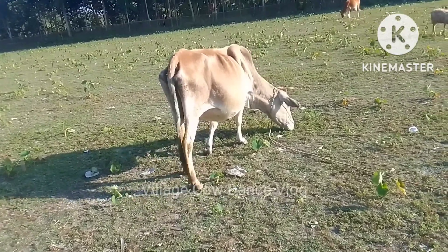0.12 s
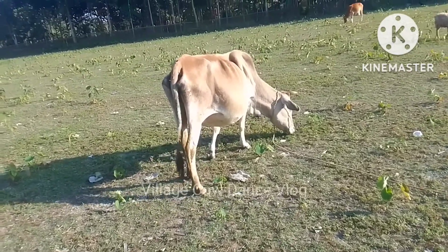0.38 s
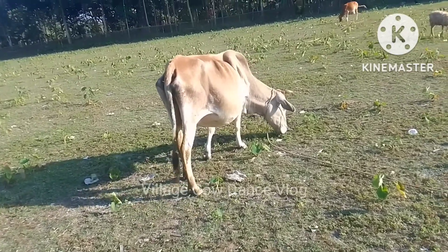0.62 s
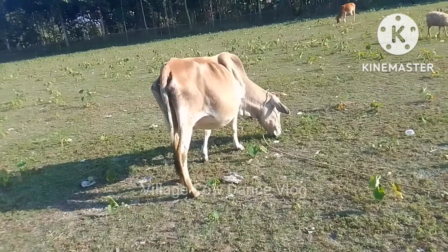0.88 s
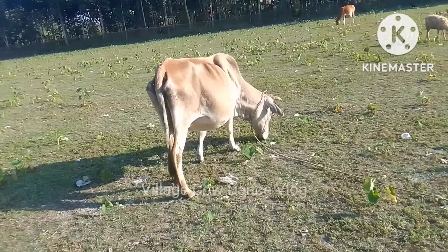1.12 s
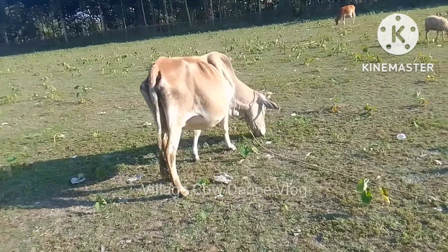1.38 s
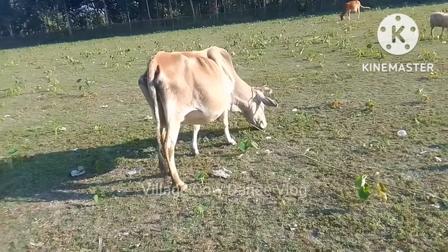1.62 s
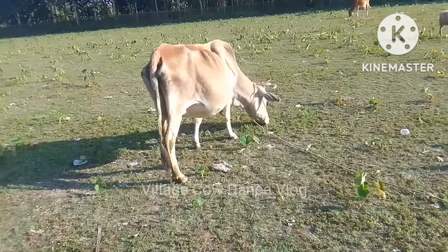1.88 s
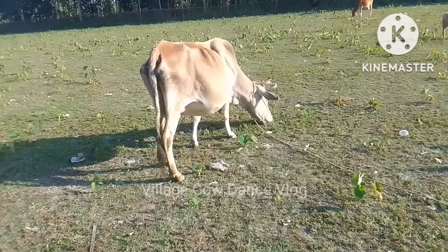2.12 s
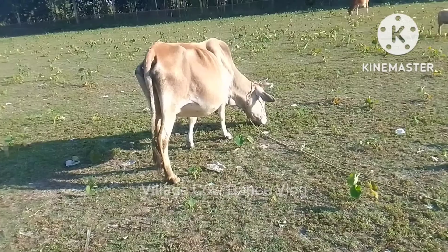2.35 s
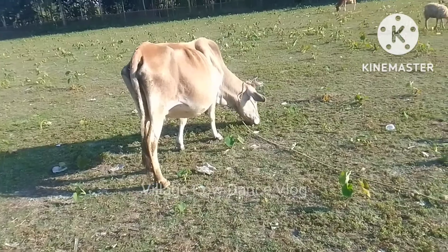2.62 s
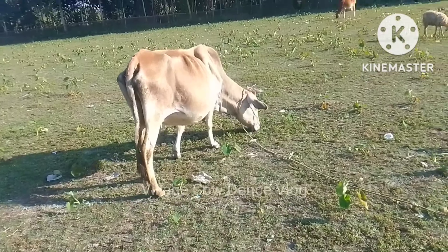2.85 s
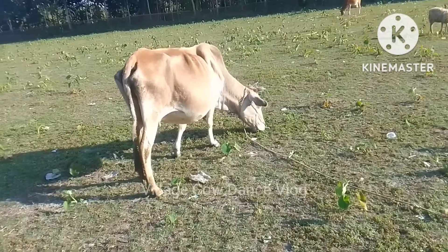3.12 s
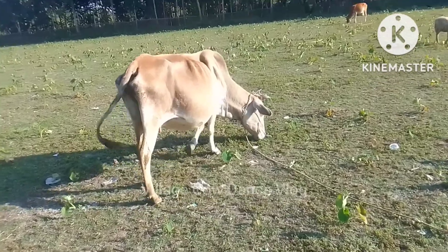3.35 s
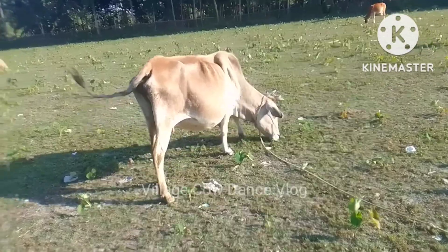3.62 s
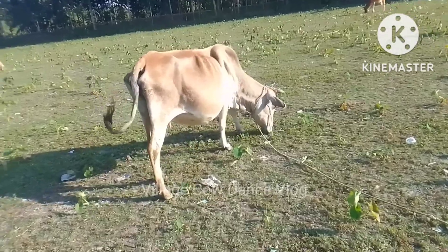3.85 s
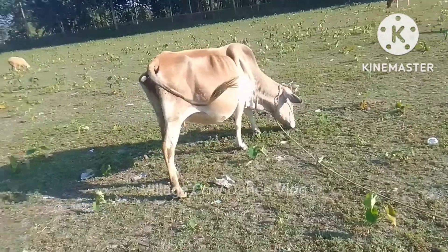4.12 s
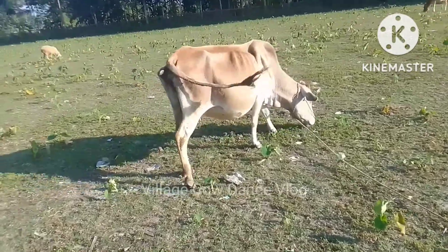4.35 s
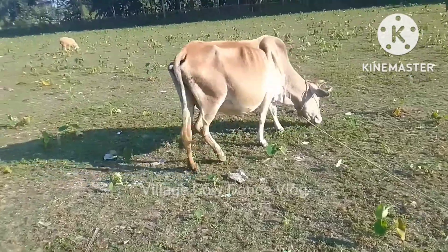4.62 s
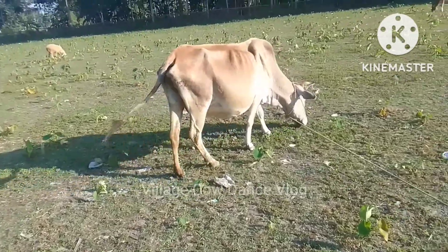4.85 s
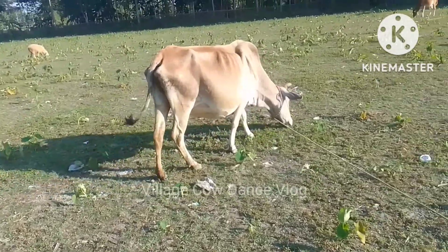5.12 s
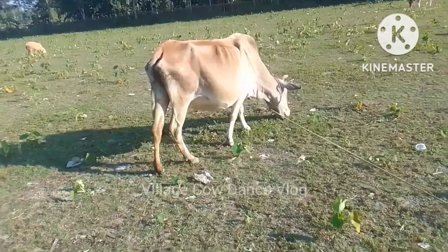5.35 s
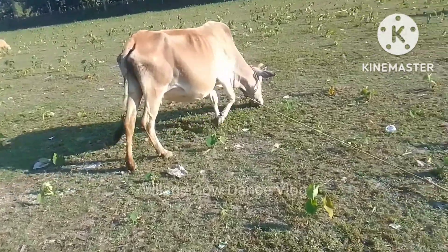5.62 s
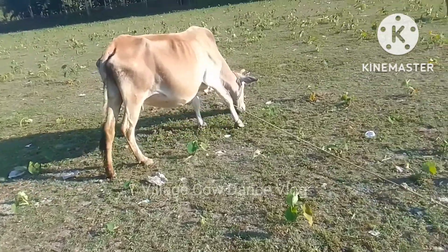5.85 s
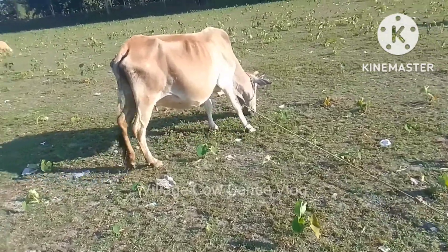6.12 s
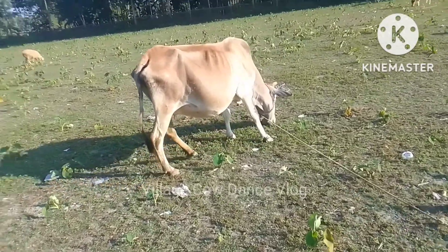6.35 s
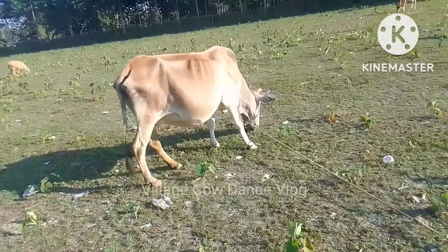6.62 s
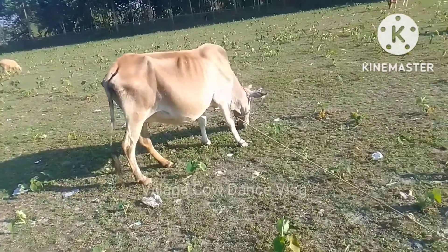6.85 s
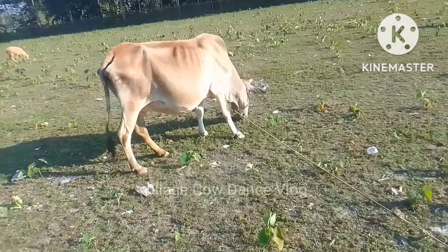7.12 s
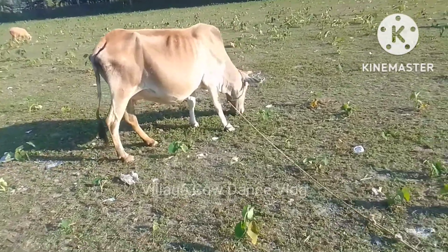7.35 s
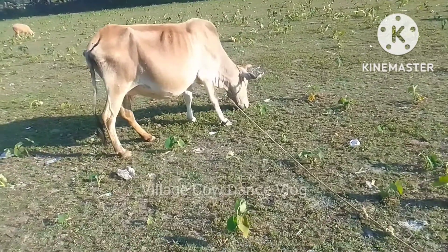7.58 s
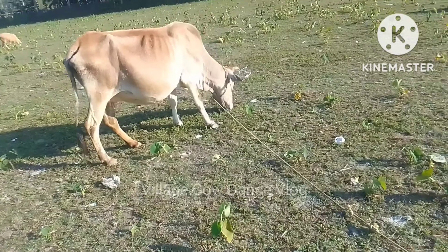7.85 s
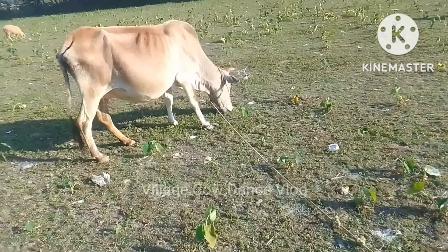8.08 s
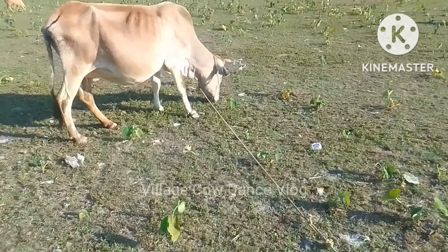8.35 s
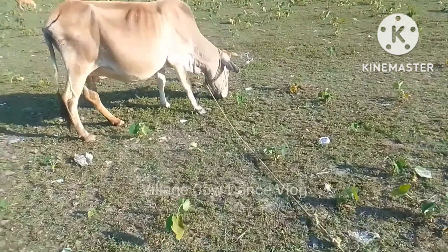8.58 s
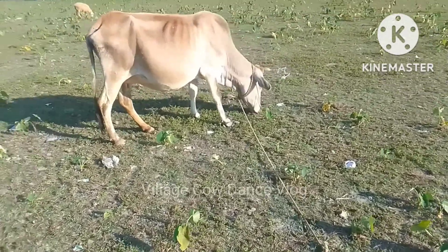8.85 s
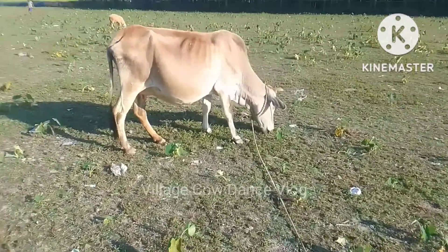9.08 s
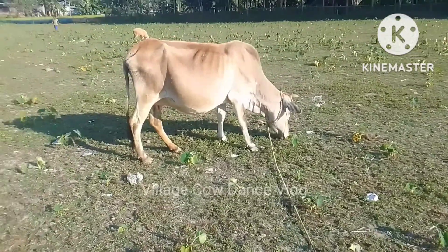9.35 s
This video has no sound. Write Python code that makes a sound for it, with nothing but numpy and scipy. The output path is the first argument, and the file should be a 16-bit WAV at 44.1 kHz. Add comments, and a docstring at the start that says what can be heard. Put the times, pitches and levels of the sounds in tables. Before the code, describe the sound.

Open field, nearly dry sound, with faint wind mutter and thin steady air throughout. After a short quiet opening, a cow hums from 0.4 s with mouth shut, opens at 0.7 into a low, buzzy moo near 87 Hz, and closes, sinking away by 2.0. In the gap, quick faint bird chirps, a small wind thump, a dry stalk snap at 2.1, grass rustle and a weak far moo. At 2.5 a creaky hum rises, cracks upward at 2.9 and holds a harsh, rough high bellow around 500 Hz until 4.7, then tumbles to a growl by 5.2. Brief rustle at 5.6 as the third call climbs; from 6.0 to 7.0 it is the loudest, a rounded hoot near 260 Hz, then drops low by 7.7. A faint far moo overlaps the fourth call's creaky start at 7.8; it rises to about 150 Hz at 8.5 and sinks until 9.5, with soft grass rustling.

```python
"""Cows moo in an open field: four calls start low and open out; the second and third break into a high register.
Each voice is a source and filter: pulses of air and turbulence excite the moving resonances of a throat.
Far cattle and small birds are gliding sines; breath hisses with the effort of the calls.
Filtered grains make the grass rustle and snap; shaped noise makes wind and a thin steady air."""
import sys
import numpy as np
from scipy import signal
from scipy.fft import rfft, irfft
from scipy.io import wavfile
from scipy.ndimage import uniform_filter1d

SR = 44100
rng = np.random.default_rng(int(sys.argv[2]) if len(sys.argv) > 2 else 0)


def store_wav(level_fs):
    """Save 16-bit WAV to argv[1]."""
    pcm = np.round(np.clip(np.atleast_2d(level_fs), -1, 1) * 32767)
    wavfile.write(sys.argv[1], SR, pcm.T.astype(np.int16))


def convert_level_to_amplitude(level_db):
    """Map a level in decibels to its linear amplitude factor."""
    exponent = np.asarray(level_db, float) / 20
    return 10 ** exponent


N = 417612
TIME = np.arange(N) / SR

CREAK = 3.0   # how sharply slow folds chop the turbulence into one burst a cycle
# Throat resonances of the shut mouth in the second and third calls: freq_hz, level_db
SHUT_MOUTH = [(95, -4), (240, -2), (580, -10), (850, -10.5), (1650, -8.5), (2700, -20)]


def cows():
    """Linear superposition: four calls add, and most phrases also excite a chest resonance."""
    plain, through_chest = np.zeros(N), np.zeros(N)
    first_call(plain)
    second_call(through_chest)
    third_call(plain, through_chest)
    fourth_call(through_chest)
    return plain + through_chest + chest(through_chest)


def first_call(out):
    """Source and filter: one low note passes through a shut, an open and a closing mouth."""
    # Pitch glides: start_s, end_s, from_hz, to_hz, bend (1 straight, higher = flatter top)
    low = [(.36, 1.1, 59.5, 87.36, 6.0), (1.2, 1.7, 87.26, 64.22, 3.9)]
    # Throat resonances: freq_hz, level_db
    shut = [(85, 1.5), (250, 11.5), (580, 8), (850, -3), (2000, -4), (2900, -13.5)]
    open_mouth = [(90, -16), (310, 3.5), (620, -10), (790, 4.5), (1130, -0.5), (1580, -5), (2100, -1.5),
                  (2600, -7.5), (3300, -18.5), (4300, -27.5)]
    closing = [(300, 8), (760, -8.5), (1950, -16), (2750, -9)]
    add(out, *phrase(low, (.36, .725), shut, (-10, -20), slide=(1.05, .88), creak=CREAK))
    add(out, *phrase(low, (.715, 1.665), open_mouth, (-21, -14), reopen=0.98),
        fade_s=0.0053, fade_out_s=0.066)
    add(out, *phrase(low, (1.62, 1.97), closing, (-8, 10), slide=(1.06, .9), creak=0.33), fade_s=0.085)


def second_call(out):
    """Register break: the pitch leaps, a second vibration joins the folds, then the note falls."""
    # Pitch glides: start_s, end_s, from_hz, to_hz, bend (1 straight, above 1 = flatter top, below 1 = steeper)
    low = [(2.53, 2.93, 81.54, 161.1, .6)]
    break_note = [(2.9, 3.0, 323.6, 337, 1.35)]
    high = [(3.09, 3.87, 438.4, 518.4, 1.02), (3.87, 4.7, 521.8, 487.2, 4.5)]
    fall = [(4.66, 4.97, 301, 162.4, 3.4), (4.97, 5.16, 159.8, 71.1, .55)]
    # Second vibration of the folds: time_s, pitch_hz, level_db (against the first)
    second = [(3.36, 308, -4), (4.7, 310, -1)]
    # Every few cycles one stands out: cycles, then rows of time_s, level_db
    fifths = 5, [(3.37, -14), (3.6, -7)]
    # Throat resonances, and the low hump that the closing mouth adds: freq_hz, level_db
    open_mouth = [(268, 11), (490, 3.5), (625, 10), (920, 6), (1130, 15), (1620, 5.5), (2100, 6),
                  (2700, -11.5), (3500, -24.5)]
    nasal = [(225, 18.5)]
    add(out, *phrase(low, (2.53, 2.85), SHUT_MOUTH, (-12, -16), slide=(1.06, .88), creak=CREAK))
    add(out, *phrase(low, (2.84, 2.912), open_mouth, (-12, -6)))
    add(out, *phrase(break_note, (2.9, 3.102), open_mouth, (-2, -2), jitter=0.0055))
    add(out, *phrase(high, (3.09, 3.38), open_mouth, (-10, -7), ringing=(2, 4.)))
    add(out, *phrase(high, (3.367, 4.71), open_mouth, (-5, -3), jitter=0.00507, second=second,
                     uneven=fifths, slide=(.96, 1.02)), fade_out_s=.05)
    add(out, *phrase(fall, (4.66, 5.16), open_mouth + nasal, (-1, -9), jitter=.004), fade_s=0.02)
    add(out, *phrase(fall, (5.12, 5.36), open_mouth, (15, 15)), fade_s=0.059)


def third_call(plain, through_chest):
    """Locking to a resonance: the fundamental of the high note stands far out; low notes flank it."""
    # Pitch glides: start_s, end_s, from_hz, to_hz, bend (1 straight, higher = flatter top)
    low = [(5.57, 5.98, 84.16, 162.9, 1)]
    high = [(5.96, 6.6, 243.3, 268.4, 4.0), (6.6, 7.05, 269.8, 247, 3.3)]
    fall = [(7.03, 7.72, 157.2, 70.53, 1.1)]
    # Every few cycles one stands out: cycles, then rows of time_s, level_db
    thirds = 3, [(6.55, -39), (6.75, -8), (7.05, 0)]
    # Throat resonances: freq_hz, level_db
    open_mouth = [(130, -16), (275, 4.5), (760, -3.5), (1130, -3), (1350, -5), (1700, -9), (2250, -16.5),
                  (2800, -25.5)]
    add(through_chest, *phrase(low, (5.57, 5.73), SHUT_MOUTH, (-6, -10), creak=CREAK))
    add(through_chest, *phrase(low, (5.72, 5.98), open_mouth, (-13, -14)), fade_out_s=0.02)
    add(plain, *phrase(high, (5.95, 7.06), open_mouth, (-13, -23), jitter=0.0038, ringing=(1, 16.),
                       uneven=thirds), fade_s=.025)
    add(through_chest, *phrase(fall, (7.03, 7.72), open_mouth, (-15, -13)), fade_s=.025)


def fourth_call(out):
    """Source and filter: a note climbs as the mouth opens, then sinks."""
    # Pitch glides: start_s, end_s, from_hz, to_hz, bend (1 straight, higher = flatter top)
    low = [(7.82, 8.03, 44.8, 73.7, 1), (8.08, 8.37, 72.75, 144.5, 1.1), (8.37, 8.55, 145.8, 152.9, 2.02),
           (8.55, 9.47, 152.2, 88.1, 3.4)]
    # Throat resonances: freq_hz, level_db
    shut = [(85, 6.1), (250, 3.4), (620, 9.8)]
    open_mouth = [(130, -3), (277, 6), (615, 12), (1080, 1.5), (1230, 3), (1900, -5.5), (2250, -12),
                  (2700, -20.5), (4300, -39.5)]
    add(out, *phrase(low, (7.82, 8.19), shut, (2, -13), creak=CREAK))
    add(out, *phrase(low, (8.175, 9.47), open_mouth, (-17, -16)), fade_s=0.0045)


def chest(voice):
    """Sharp low resonance: a two-pole filter swells when a partial of the voice crosses it."""
    centre_hz, width_hz, level_db = 274, 18, 4
    r = np.exp(-np.pi * width_hz / SR)
    w = 2 * np.pi * centre_hz / SR
    zeros = [(1 - r * r) / 2, 0, (r * r - 1) / 2]
    poles = [1, -2 * r * np.cos(w), r * r]
    return convert_level_to_amplitude(level_db) * signal.lfilter(zeros, poles, voice + 1e-18)


def phrase(note, when, mouth, rasp_db, jitter=0.0027, ringing=None, second=None, uneven=None,
           slide=(1, 1), reopen=0, creak=0):
    """Source-filter voice: folds puff at the pitch; turbulence gated by each cycle shares their throat.

    when: from_s, to_s; rasp_db: rasp against tone at start and end, before strain; ringing: partial, level_db.
    """
    reopen_cycle, reopen_dull_hz = .7, 1584   # a duller second puff later in each cycle
    start = int(when[0] * SR)
    now = TIME[start:int(when[1] * SR)]
    size = len(now)
    pitch = uniform_filter1d(glide(note, now), SR // 20, mode="nearest")   # muscles round every corner
    strain = np.minimum(np.abs(np.gradient(np.log(pitch))) * SR, 2)   # a gliding voice is less steady
    unsteady_pitch = pitch * (1 + jitter * (1 + 1.9 * strain) * drift(size, 40))
    phase = 2 * np.pi * np.cumsum(unsteady_pitch) / SR
    second_puff = puffs(phase - 2 * np.pi * reopen_cycle, pitch, reopen_dull_hz)
    folds = puffs(phase, pitch) + reopen * second_puff

    if second:      # two vibrations sound side by side
        s, hz, db = np.transpose(second)
        other_hz = np.interp(now, s, hz) * (1 + jitter * drift(size, 5.05))
        turn = 2 * np.pi * np.cumsum(other_hz) / SR
        other = puffs(turn, other_hz, 840) - .5 * np.cos(turn)   # weak at its own pitch, heard by overtones
        folds = folds + convert_level_to_amplitude(np.interp(now, s, db)) * other

    beat = 1
    if uneven:      # the standing-out cycle slips a little early or late
        cycles, depth = uneven
        slip = 90.0 * jitter * drift(size, 15)
        beat = 1 + 2 * convert_level_to_amplitude(np.interp(now, *np.transpose(depth))) * np.cos(phase / cycles + slip)
    folds = folds * beat

    poses = mouth_poses(mouth, now, slide)
    folds = folds * convert_level_to_amplitude(110.0 * jitter * drift(size, 41))   # unsteady folds also shut with uneven force
    tone = evened(moving_throat(folds, poses))
    if ringing:     # the folds lock onto a resonance: one partial stands far out
        partial, partial_db = ringing
        tone = evened(tone + convert_level_to_amplitude(partial_db) * np.sin(partial * phase))

    gate = beat * np.exp(creak * np.cos(phase - 1)) * convert_level_to_amplitude(2.5 * drift(size, 15))
    rasp = moving_throat(gate * rng.standard_normal(size), poses)
    no_bass = signal.butter(4, 210, "high", fs=SR, output="sos")   # turbulence has no bass
    rasp = evened(signal.sosfilt(no_bass, rasp), 0.076)
    share = convert_level_to_amplitude(np.linspace(*rasp_db, size) + 3.4 * strain)
    voice = (tone + share * rasp) / np.sqrt(1 + share ** 2)
    return start, convert_level_to_amplitude(effort_db(now)) * voice


def glide(rows, now):
    """Pitch contour: power-law glides, held beyond the ends.

    bend above 1: a rise slows into its top, a fall gathers speed; below 1: a rise gathers speed, a fall slows.
    """
    pitch = np.full(len(now), float(rows[0][2]))
    for start, end, from_hz, to_hz, bend in rows:
        u = np.clip((now - start) / (end - start), 0, 1)
        share = 1 - (1 - u) ** bend if to_hz > from_hz else u ** bend
        pitch = np.where(now >= start, from_hz + (to_hz - from_hz) * share, pitch)
    return pitch


def puffs(phase, pitch_hz, dull_hz=4000):
    """Pulse train as a geometric harmonic series: one puff of air per cycle, harmonics fading upward."""
    a = np.exp(-pitch_hz / dull_hz)
    return (1 - a * np.cos(phase)) / (1 - 2 * a * np.cos(phase) + a * a) - 1


def mouth_poses(resonances, now, slide):
    """Articulation: resonances above the lowest two slide and wander; passing ones come and go."""
    wander_s, wander_db, wander_share = .13, 1.6, .012   # tongue and jaw never hold still
    pass_db_per_s = 91   # how fast passing resonances rise and sink
    # Resonances that pass as lips and tongue move: strongest_s, freq_hz, level_db
    passing = [(1.57, 1390, -1.5), (1.5, 2000, 0), (2.65, 1740, -3.5), (2.64, 3350, -16.5),
               (2.98, 1280, 9.5), (4.55, 1026, 17), (5.77, 1500, -2.5), (7.42, 1530, 1), (8.14, 1480, 2),
               (8.13, 2000, 1), (8.14, 3140, -14.5), (8.13, 5740, -17.5)]
    count = 2 + int(2 * (now[-1] - now[0]) / wander_s)
    draws = rng.standard_normal((count, len(resonances), 2))
    chance = np.sqrt(2) * uniform_filter1d(draws, size=2, axis=0)
    moments = np.linspace(now[0], now[-1], count)
    scales = np.linspace(*slide, count)
    poses = []
    for moment, scale, row in zip(moments, scales, chance):
        pose = list(resonances[:2])
        for s, hz, db in passing:
            if abs(moment - s) < .5:
                pose.append((hz, db - pass_db_per_s * abs(moment - s)))
        for (hz, db), (a, b) in zip(resonances[2:], row):
            pose.append((hz * scale * (1 + wander_share * a), db + wander_db * b))
        poses.append(pose)
    return poses


def moving_throat(x, poses):
    """Time-varying filter: each stretch passes through its own mouth shape, blending into the next."""
    place = np.linspace(0, len(poses) - 1, len(x))
    return sum(throat(np.clip(1 - np.abs(place - k), 0, 1) * x, pose) for k, pose in enumerate(poses))


def throat(x, resonances, size=8192):
    """Minimum-phase filter: steep-skirted resonances, wider the higher, summed in power."""
    hz = np.fft.rfftfreq(size, 1 / SR)
    power = 0
    for centre, db in resonances:
        width_hz = 49.0 + 0.13 * centre
        power = power + convert_level_to_amplitude(2 * db) / (1 + (2 * (hz - centre) / width_hz) ** 2) ** 2
    # folding the cepstrum onto positive time makes the response causal
    cepstrum = irfft(.5 * np.log(power + 1e-12), size)
    cepstrum[1:size // 2] *= 2
    cepstrum[size // 2 + 1:] = 0
    response = irfft(np.exp(rfft(cepstrum)), size)[:size // 2]
    return signal.fftconvolve(x, response)[:len(x)]


def effort_db(now):
    """Vocal effort as level: interpolates in decibels through all four calls."""
    # Effort, one list per call: time_s, level_db (before the chest adds)
    effort = [
        [(.36, -58.5), (.45, -32), (.71, -28), (.73, -19.5), (1.655, -16.5), (1.685, -25), (1.8, -33),
         (1.97, -49)],
        [(2.53, -41), (2.7, -24.5), (2.785, -31.5), (2.87, -18), (3.25, -16), (3.4, -18.5), (4.7, -19),
         (5.05, -21), (5.17, -46.5), (5.36, -70)],
        [(5.57, -44), (5.72, -23.5), (5.8, -17.5), (6.15, -8), (6.87, -8), (7.05, -16.5), (7.23, -19),
         (7.38, -19), (7.59, -28), (7.68, -40.5), (7.72, -87)],
        [(7.82, -54.5), (8.01, -33), (8.02, -29), (8.19, -19), (8.35, -14.5), (9.1, -16.5), (9.47, -21)],
    ]
    return np.interp(now, *np.transpose(np.concatenate(effort)))


def breath():
    """Turbulent flow noise: air hisses from nose and mouth with the effort of the call."""
    full_effort_db, follows = -53, 0.24   # hiss at an effort of 0 dB; share of the effort's swing
    # Hiss outline: freq_hz, level_db (relative, per Hz)
    hiss_spectrum = [(3500, -5.5), (9800, -6.5), (15500, -17)]
    level_db = full_effort_db + follows * effort_db(TIME) + 2.0 * drift(N, 9.0)
    return convert_level_to_amplitude(level_db) * coloured(rng.standard_normal(N), hiss_spectrum)


def far_cattle():
    """Near-pure tones: distant moos as wavering, gliding sines."""
    # Far moos: start_s, length_s, from_hz, to_hz, level_db (rms at the swell's top, before waver)
    moos = [(2.2, 0.4, 856, 847, -51.5), (7.66, 0.43, 618, 500, -56)]
    return far_notes(moos, 23, 0.39)


def birds():
    """Near-pure tones: quick chirps as gliding sines with a fast waver."""
    # Chirps: start_s, length_s, from_hz, to_hz, level_db (rms at the swell's top, before waver)
    chirps = [(1.83, 0.073, 3900, 5040, -50.5), (1.885, 0.087, 4750, 3789, -47.5),
              (2.01, 0.095, 4200, 3210, -44.5), (2.065, 0.069, 3320, 3274, -47),
              (2.165, 0.063, 1850, 2270, -51.5), (5.37, .17, 3000, 1464, -60),
              (7.71, 0.039, 7050, 5390, -52)]
    return far_notes(chirps, 230, 0.6)


def far_notes(notes, blur_hz, blur):
    """Amplitude modulation: gliding sines swell, fade and waver on their way across the field."""
    out = np.zeros(N)
    for start, length, from_hz, to_hz, level_db in notes:
        size = int(length * SR)
        waver = (1 + blur * drift(size, blur_hz)) * np.sin(np.linspace(0, np.pi, size))
        tone = np.sin(2 * np.pi * np.cumsum(np.geomspace(from_hz, to_hz, size)) / SR)
        add(out, int(start * SR), np.sqrt(2) * convert_level_to_amplitude(level_db) * waver * tone)
    return out


def grass():
    """Granular impulse noise: dense uneven grains of dry blades rustle, single stalks snap."""
    rest_db = -73   # between rustles
    # Rustles: peak_s, peak_db (added to the rest), build_s, die_s
    rustles = [(2.135, -48.5, 0.014, 0.018), (2.25, -44.5, 0.073, 0.077), (5.595, -44, 0.051, 0.024),
               (8.75, -53.5, 0.78, 0.34)]
    # Rustle outline: freq_hz, level_db (relative, per Hz)
    grain_spectrum = [(2500, -5.5), (7500, -9), (9500, 1.5), (15500, -22.5)]
    # Breaking stalks: start_s, peak_db
    snaps = [(2.1278, -23.5)]
    sizes = convert_level_to_amplitude(4.0 * np.minimum(rng.exponential(1, N), 5)) * rng.choice([-1, 1], N)
    grains_per_s = 2500 * convert_level_to_amplitude(4.0 * drift(N, 20))
    grains = sizes * (rng.random(N) < grains_per_s / SR)
    out = swells(rustles, rest_db) * coloured(grains, grain_spectrum)
    band = signal.butter(2, [4000, 12000], "band", fs=SR, output="sos")
    for s, db in snaps:
        crack = rng.standard_normal(400) * np.exp(-np.arange(400) / (0.027 * SR))
        crack = signal.sosfilt(band, crack)
        out[int(s * SR):int(s * SR) + 400] += convert_level_to_amplitude(db) * crack / np.abs(crack).max()
    return out


def wind():
    """Modulated low noise: wind mutters on the microphone, with one short thump and one long gust."""
    rest_db = -58   # apart from thump and gust, before the lumps
    # Thump, then gust: peak_s, peak_db (added to the rest), build_s, die_s
    thump_and_gust = [(1.99, -42.5, 0.011, 0.045), (2.2, -51.5, 2, 0.018)]
    # Wind outline: freq_hz, level_db (relative, per Hz)
    wind_spectrum = [(25, -14), (120, -3), (350, -10), (2500, -27.5), (4000, -63)]
    lumps = convert_level_to_amplitude(3.0 * drift(N, 8))
    return swells(thump_and_gust, rest_db) * lumps * coloured(rng.standard_normal(N), wind_spectrum)


def steady_air():
    """Stationary shaped noise: a thin steady air at -68 dB rms."""
    # Air outline: freq_hz, level_db (relative, per Hz)
    air_spectrum = [(300, -23), (900, 2.5), (3000, 13), (5500, -26.5), (9500, -10.5), (15500, -20)]
    return convert_level_to_amplitude(-68) * coloured(rng.standard_normal(N), air_spectrum)


def swells(rows, rest_db):
    """Exponential growth and decay: gain builds to each peak and dies away, over a resting level."""
    gain = convert_level_to_amplitude(rest_db)
    for s, db, build, die in rows:
        gain = gain + convert_level_to_amplitude(db) * np.exp(-np.abs(TIME - s) / np.where(TIME < s, build, die))
    return gain


def scattered(x, t60, level_db):
    """Diffuse reflection: convolution adds a dying cloud of echoes; t60 in seconds."""
    t = np.arange(SR // 2) / SR
    cloud = rng.standard_normal(len(t)) * convert_level_to_amplitude(-60 * t / t60) * (t > .002)
    cloud = cloud / np.sqrt(np.sum(cloud ** 2))
    return x + convert_level_to_amplitude(level_db) * signal.fftconvolve(x, cloud)[:N]


def add(out, start, x, fade_s=.012, fade_out_s=None):
    """Superposition: mixes a piece in with short sine fades."""
    samples = np.arange(len(x))
    edge = np.minimum(samples / fade_s, samples[::-1] / (fade_out_s or fade_s)) / SR
    out[start:start + len(x)] += x * np.sin(np.pi / 2 * np.clip(edge, 0, 1))


def evened(x, window_s=.04):
    """Envelope normalization: divides out the slow level."""
    width = int(window_s * SR)
    power = uniform_filter1d(uniform_filter1d(x ** 2, width), width)
    return x / np.sqrt(power + 1e-12)


def coloured(x, spectrum):
    """Spectral shaping: weights noise by an outline joined on a log-frequency axis; rms 1."""
    hz = np.maximum(np.fft.rfftfreq(len(x), 1 / SR), 1)
    points = np.array(spectrum)
    outline_db = np.interp(np.log(hz), np.log(points[:, 0]), points[:, 1])
    return rms_one(irfft(rfft(x) * convert_level_to_amplitude(outline_db), len(x)))


def drift(size, rate):
    """Low-passed noise: slow random motion of rms 1, with a double pole at rate in Hz."""
    r = np.exp(-2 * np.pi * rate / SR)
    noise = rng.standard_normal(size + SR // 2)
    return rms_one(signal.lfilter([1], [1, -2 * r, r * r], noise)[SR // 2:])   # the filter settles first


def rms_one(x):
    """Power normalization: scales to unit rms."""
    return x / np.sqrt(np.mean(x ** 2) + 1e-20)


def scene():
    """Scattering: ground and flanks spread the near voices briefly, trees the birds for longer."""
    near = scattered(cows(), .064, -12)
    far = far_cattle() + scattered(birds(), 0.42, -1.5)
    return (near + breath() + far + grass() + wind() + steady_air())[None]


def low_pass(x):
    """Removes everything above the highest recorded frequency."""
    return signal.sosfilt(signal.butter(12, 15660, fs=SR, output="sos"), x)


def record(dry):
    """Soft saturation: the microphone rounds peaks as they near its full scale."""
    full_scale = 0.99
    mix = full_scale * np.tanh(dry / full_scale)
    return low_pass(mix)


dry = scene()
out = record(dry)
store_wav(out)
```